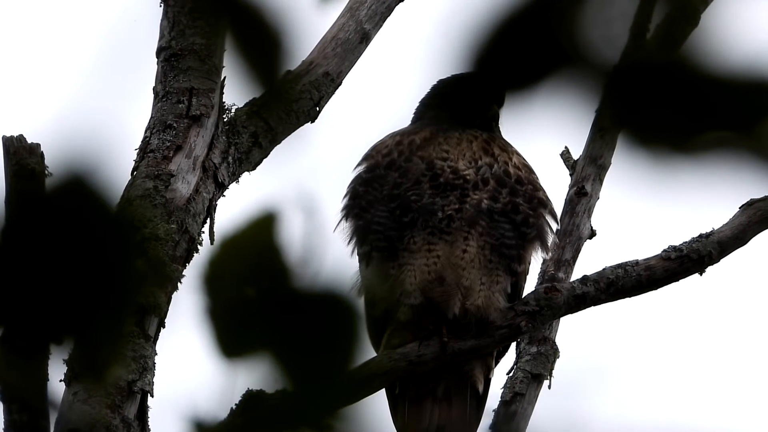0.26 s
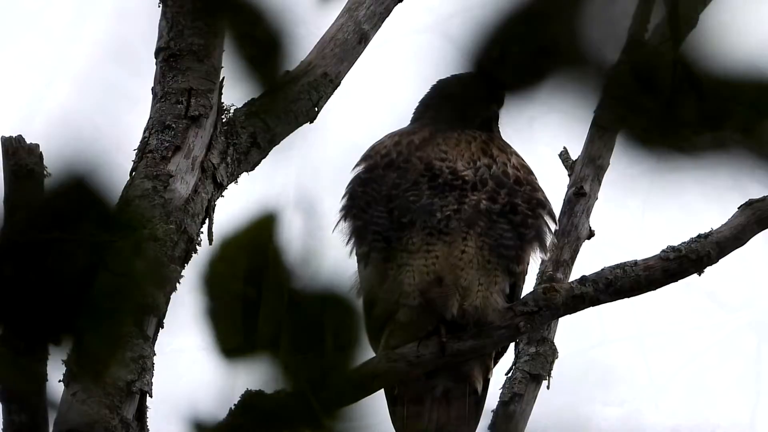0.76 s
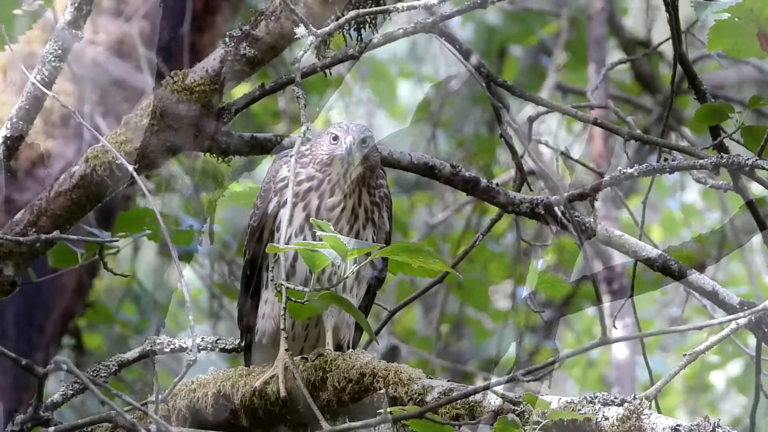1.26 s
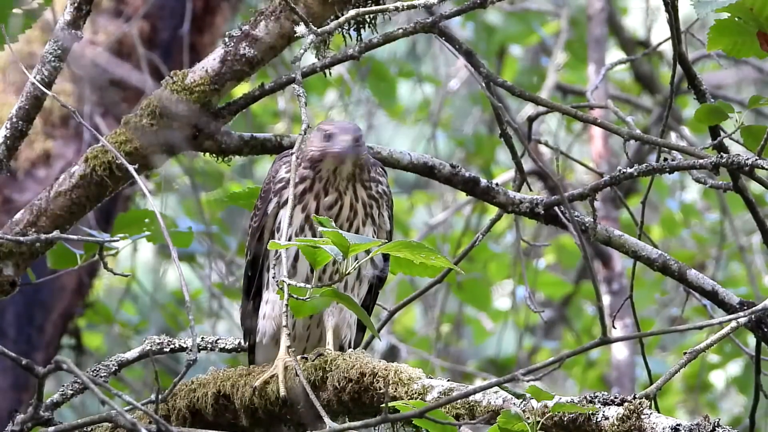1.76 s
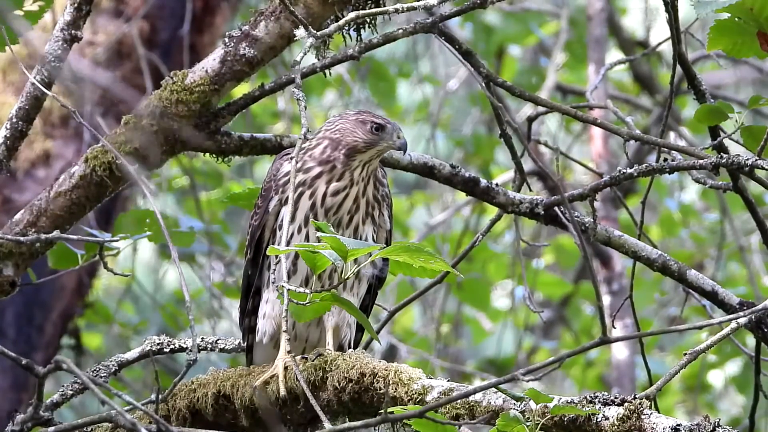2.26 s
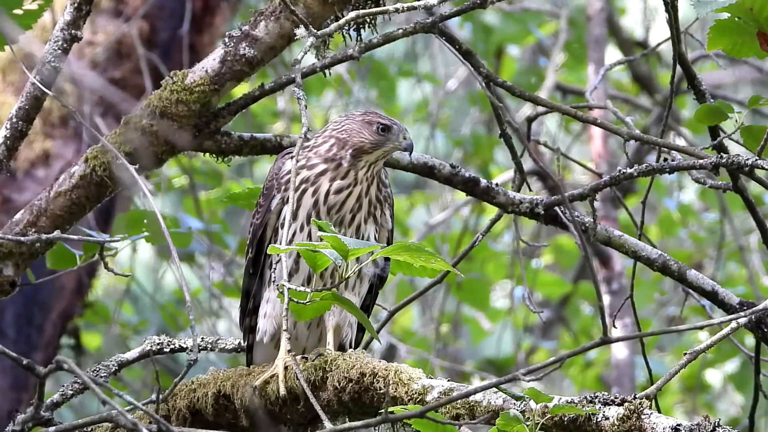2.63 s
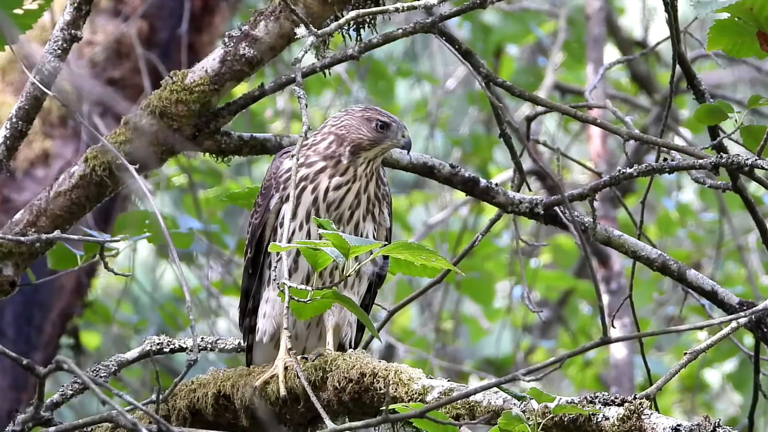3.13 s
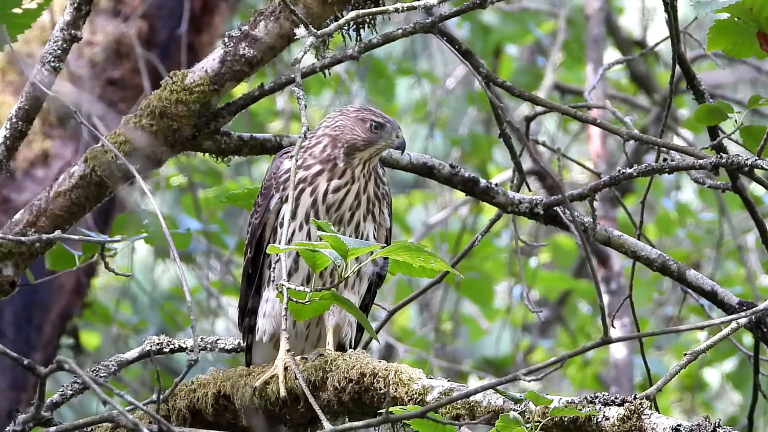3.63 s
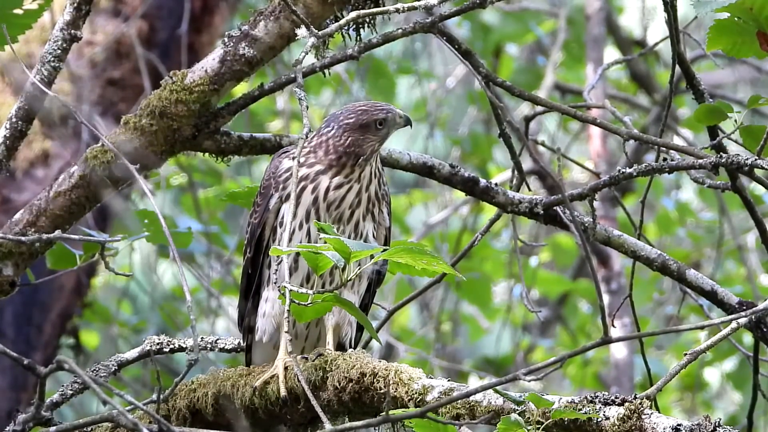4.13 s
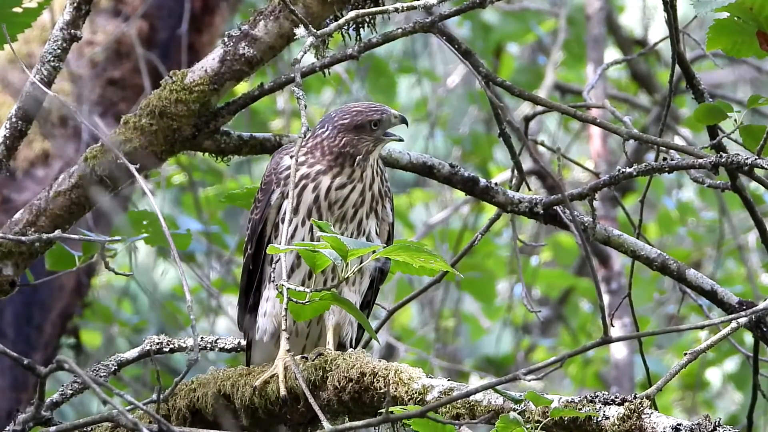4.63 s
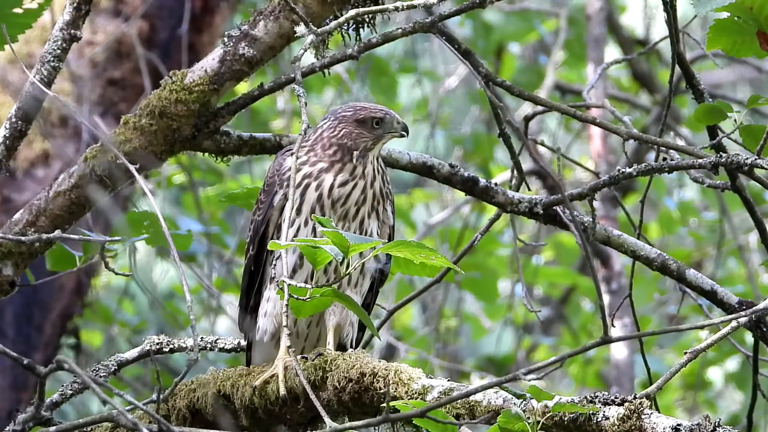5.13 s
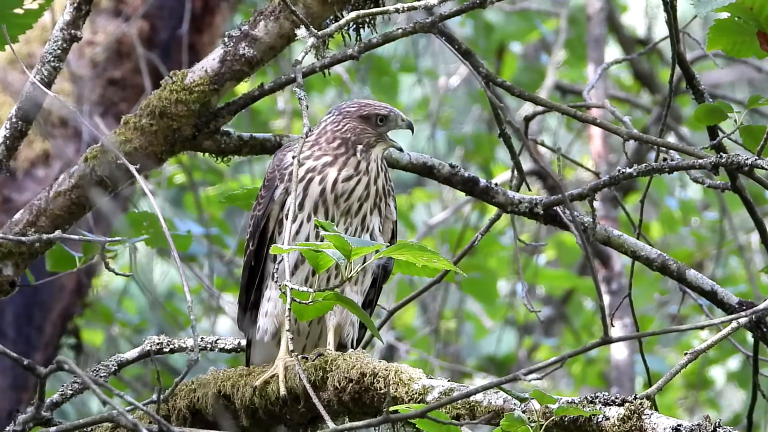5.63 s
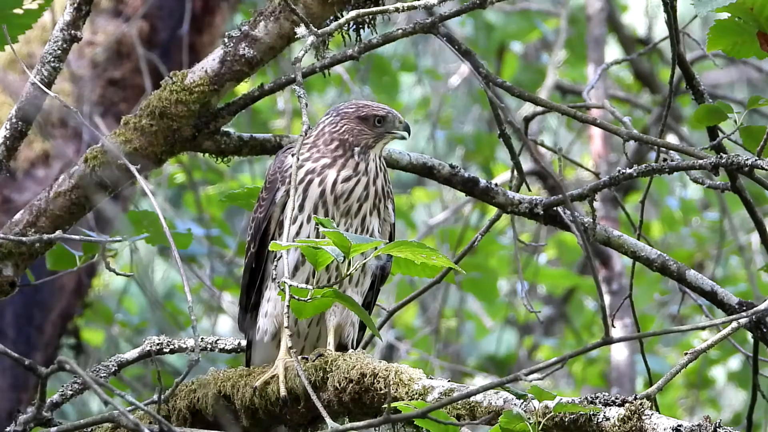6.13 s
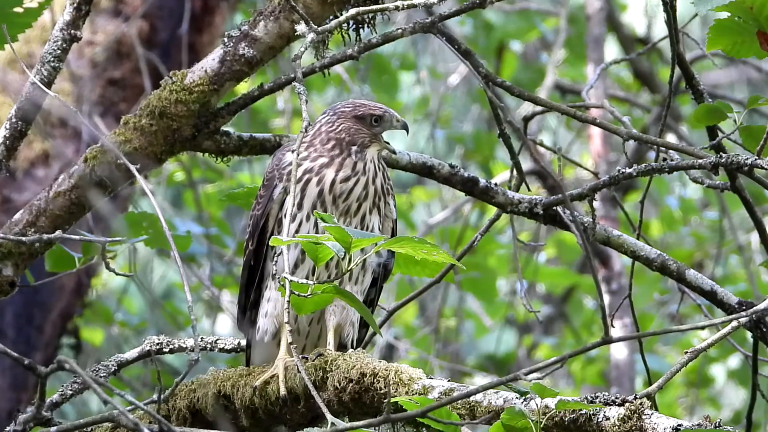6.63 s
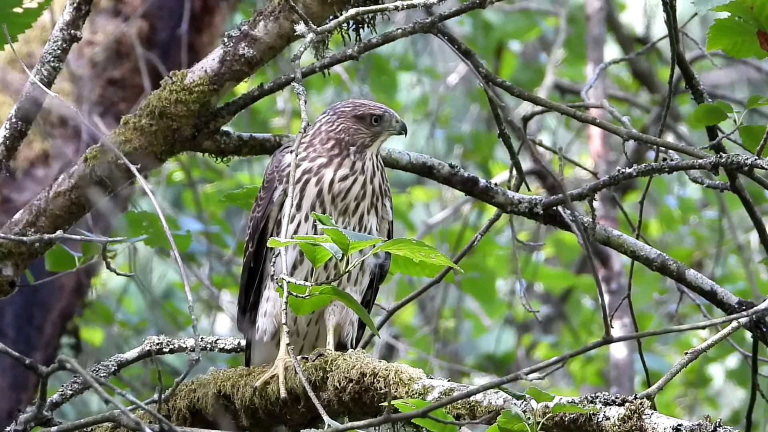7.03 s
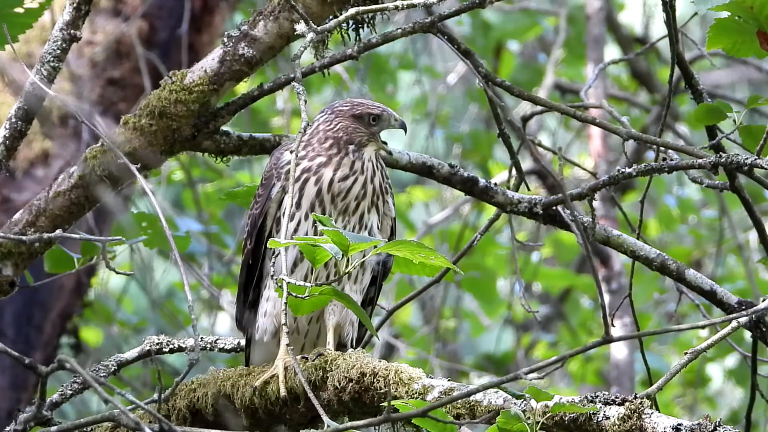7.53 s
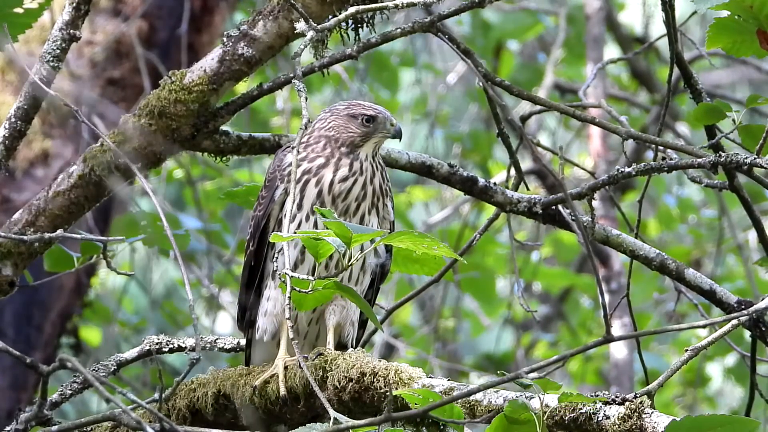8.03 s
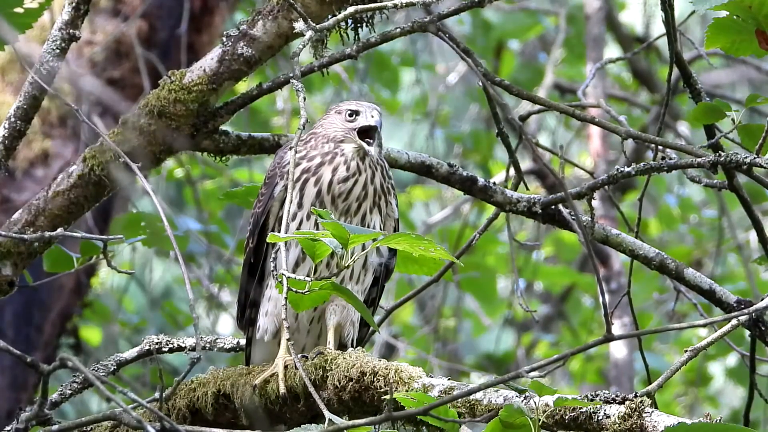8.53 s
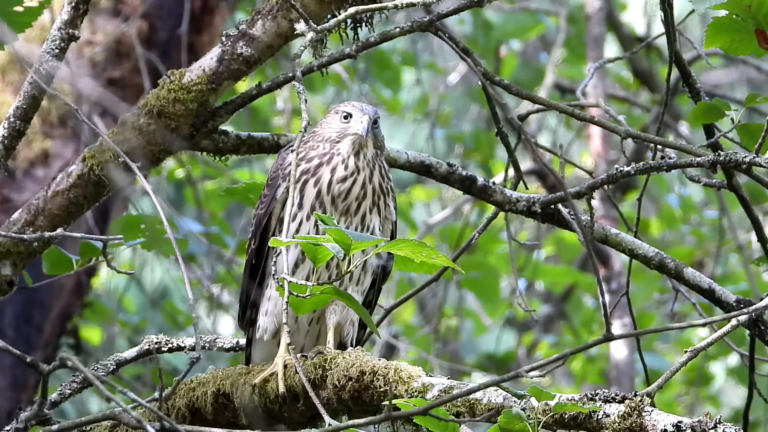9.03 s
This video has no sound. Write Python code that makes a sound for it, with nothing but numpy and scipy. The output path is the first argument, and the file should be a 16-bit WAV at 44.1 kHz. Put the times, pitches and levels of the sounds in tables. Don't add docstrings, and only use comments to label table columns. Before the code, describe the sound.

For the first four seconds there is only quiet forest ambience: low, uneven gusts bump softly against the camera microphone, a distant road rumbles and swells slightly around one second, and thin hiss lies on top. The faint background starts a little wide, then becomes mono by 1.6 seconds. Tiny blurred songbird notes appear mostly in the first second and a half, with a few later. Soft low knocks on the camera body fall at 2.2 and, fainter, 3.0. At about 4.5 a young hawk gives a short, weak, falling whistle. Stronger calls follow at 5.4, 6.4, 7.4 and 8.4, each roughly half a second: a quick buzzy upward scoop, then a piercing whistle sliding down, rough and beating, with a short echo off trunks. The last is highest and longest. Wind dies down; a faint engine drone hums beneath the later calls.

```python
import sys
import numpy as np
from scipy import signal
from scipy.fft import rfft, irfft
from scipy.io import wavfile
from scipy.ndimage import uniform_filter1d

SR = 44100
rng = np.random.default_rng(int(sys.argv[2]) if len(sys.argv) > 2 else 0)


def rack_gain(trim_db):
    fader = np.asarray(trim_db, float)
    return 10 ** (fader / 20)


def wrap_up_sound(samples):
    columns = np.atleast_2d(samples).T
    tamed = np.clip(columns, -1, 1)
    steps = np.round(tamed * 32767).astype(np.int16)
    wavfile.write(sys.argv[1], SR, steps)


N = 409248
TIME = np.arange(N) / SR

# frequency in Hz, gain in dB.
THROAT_GAIN = [(300, -55.5), (1000, -19.5), (1600, -16), (2200, -15), (2800, -11), (3150, -5.5),
               (3700, 1.5), (4400, -4.5), (5500, -5), (6000, -14), (8300, -28), (9200, -28), (10300, -26),
               (13500, -42)]
RASP_TOP_DB = -36.5


def hawk():
    # time in seconds, pitch in Hz, level in dB.
    whistles = [
        [(4.52, 3170, -30), (4.554, 3122, -40), (4.562, 3094, -36), (4.584, 3010, -34.5), (4.676, 2939, -31),
         (4.706, 2773, -41.5), (4.744, 2710, -40.5), (4.775, 2636, -42.5)],
        [(5.472, 3558, -17), (5.504, 4060, -28), (5.528, 3659, -23.5), (5.574, 3488, -20), (5.694, 3353, -31),
         (5.764, 3194, -24), (5.828, 3096, -36), (5.875, 2937, -33)],
        [(6.458, 3470, -24), (6.486, 4250, -22), (6.548, 4265, -24.5), (6.632, 4020, -27), (6.638, 3747, -25),
         (6.714, 3519, -20.5), (6.824, 3390, -26.5), (6.885, 3126, -27.5)],
        [(7.451, 4240, -30), (7.459, 4220, -26.5), (7.561, 4306, -27.5), (7.637, 4096, -30.5),
         (7.669, 3825, -18), (7.685, 3850, -21.5), (7.869, 3387, -23.5), (7.934, 3210, -28.5)],
        [(8.466, 4113, -27), (8.476, 4390, -28.5), (8.596, 4250, -26.5), (8.702, 3850, -26.5),
         (8.714, 3804, -20), (8.766, 3580, -25), (8.828, 3561, -21.5), (8.932, 3234, -31)],
    ]
    # start in seconds, scoop length in seconds, top pitch in Hz,
    # time it steadies in seconds, end pitch in Hz.
    buzzes = [
        (4.475, 0.052, 1398, 4.49, 1273),
        (5.431, .047, 1568, 5.59, 1381),
        (6.423, .04, 1622, 6.71, 1494),
        (7.398, .052, 1647, 7.79, 1547),
        (8.419, .046, 1670, 8.73, 1523),
    ]
    # scoop level in dB, steady low-voice level in dB,
    # steady unsteadiness in Hz, octave level in dB, rasp level in dB.
    efforts = [
        (-40, -47, 2.5, -63.5, -41),
        (-37, -47.5, 16.3, -61.5, -39),
        (-35.5, -48, 40, -58, -36.5),
        (-35, -52, 40, -58.5, -37),
        (-34.5, -47, 24, -52.5, -35.5),
    ]
    return sum(call(*parts) for parts in zip(whistles, buzzes, efforts))


def call(whistle, buzz, effort):
    start_s, scoop_s = buzz[:2]
    scoop_db, _, _, octave_db, rasp_db = effort
    knots_s, knots_hz, knots_db = np.transpose(released(whistle))
    start = int(start_s * SR)
    t = TIME[start:int(knots_s[-1] * SR)]
    since = np.maximum(t - knots_s[0], 0)

    hi_hz, hi_db = np.interp(t, knots_s, knots_hz), np.interp(t, knots_s, knots_db)
    hi_gate = np.clip(np.minimum(t - knots_s[0], knots_s[-1] - t) / 0.004, 0, 1)
    lo_hz, lo_db, boost_db, shake_hz = low_voice(t, buzz, effort, hi_db, since)
    lo_gate = np.clip(np.minimum(t - t[0], t[-1] - t) / 0.014, 0, 1)

    hi_phase = phase_of(hi_hz + (8 + 0.06 * shake_hz) * walk(250, len(t)))
    lo_phase = phase_of(lo_hz + (10 + 1.2 * shake_hz) * walk(500, len(t)))
    flutter = np.clip(1 + (0.18 + 0.001 * shake_hz) * walk(130, len(t)), 0, 1.3)
    hi = np.sqrt(2) * hi_gate * rack_gain(hi_db) * flutter
    lo = np.sqrt(2) * lo_gate * rack_gain(lo_db + 2.03 * walk(220, len(t)))

    inner = buzz_partials(lo, lo_phase, boost_db)
    inner += mixing_tones(lo, hi_phase, lo_phase, hi_gate, since)
    inner += rasp(t, since, hi_phase, hi_gate, lo_gate, rasp_db)
    out = hi * np.sin(hi_phase) + lo * np.sin(lo_phase) + throat(inner)
    out += whistle_overtones(t, since, hi_hz, hi_db, hi_phase, hi_gate, shake_hz, octave_db)
    out += torn_halo(hi_phase, hi_gate, shake_hz, rasp_db)
    out += beak_gape(t, since, scoop_s, scoop_db)
    return np.pad(out, (start, N - start - len(t)))


def released(whistle):
    release_s, release_db, hook_share = 0.03, 20, 0.3
    s, hz, db = whistle[-1]
    hook_hz = hook_share * (max(row[1] for row in whistle) - hz)
    hook = [(s + release_s * u, hz - hook_hz * u, db - release_db * u ** 0.85) for u in (0.4, 1)]
    return list(whistle) + hook


def low_voice(t, buzz, effort, hi_db, since):
    scoop_from_hz, scoop_bend, hold_s = 920, 1.1, 0.00985
    scoop_rise_db, scoop_boost_db, scoop_shake_hz = 10.5, 8.5, 5.7
    torn_drop_db, torn_boost_db, torn_shake_hz, tear_s = 10, -3, 190.1, 0.011
    steady_s, steady_boost_db = 0.05, -1
    knee_db, follow = -37.5, 4
    tire_db, tire_s = 9.5, 0.067
    handover_db, handover_s = 12, 0.004
    start_s, scoop_s, top_hz, steadies_s, end_hz = buzz
    top_db, steady_db, calm_hz = effort[:3]

    scoop = np.clip((t - start_s) / scoop_s, 0, 1)
    after = np.clip((t - start_s - scoop_s - hold_s) / tear_s, 0, 1)
    steady = np.clip((t - steadies_s) / steady_s + 0.5, 0, 1)

    def blend(rising, torn, held):
        return (1 - after) * rising + after * ((1 - steady) * torn + steady * held)

    sag_s = max(steadies_s - steady_s, start_s + scoop_s)
    hz = scoop_from_hz + (top_hz - scoop_from_hz) * (1 - (1 - scoop) ** scoop_bend)
    hz = hz + np.interp(t, (sag_s, t[-1]), (0, end_hz - top_hz))
    held_db = steady_db + follow * np.minimum(hi_db - knee_db, 0)
    held_db = held_db - tire_db * np.exp((t - t[-1]) / tire_s)
    db = blend(top_db - scoop_rise_db * (1 - scoop), steady_db - torn_drop_db, held_db)
    bright_db = scoop_boost_db * (1 - scoop) - handover_db * np.minimum(since / handover_s, 1)
    boost_db = blend(bright_db, torn_boost_db, steady_boost_db)
    return hz, db, boost_db, blend(scoop_shake_hz, torn_shake_hz, calm_hz)


def buzz_partials(lo, lo_phase, boost_db):
    # one level each, in dB.
    partials_db = [7, 9, -5, -7, -7, -8, -9, -10]
    return sum(lo * rack_gain(boost_db + db) * np.sin(k * lo_phase + k * k) for k, db in enumerate(partials_db, 2))


def mixing_tones(lo, hi_phase, lo_phase, hi_gate, since):
    beat_db, order_db, fall_db, sum_tone_db = 13, -3.5, -2.5, 8
    couple_s = 0.022
    coupled = lo * hi_gate * np.clip(since / couple_s, 0, 1) ** 2
    out = coupled * rack_gain(sum_tone_db) * np.sin(hi_phase + lo_phase)
    for m in range(1, 4):
        for k in (-4, -3, -2, -1, 1, 2, 3):
            tone_db = beat_db + order_db * m + fall_db * abs(k)
            out += coupled * rack_gain(tone_db) * np.cos(m * hi_phase + k * lo_phase)
    return out


def rasp(t, since, hi_phase, hi_gate, lo_gate, rasp_db):
    fall_db, curve = 18, 1.1
    now_db = rasp_db - fall_db * (since / since[-1]) ** curve
    halo = rack_gain(13.0) * walk(1200, len(t)) * np.cos(hi_phase)
    breath = rack_gain(10.5) * rng.standard_normal(len(t))
    airflow = np.maximum(hi_gate, 0.4 * lo_gate * np.clip((t - t[0]) / 0.03, 0, 1))
    return rack_gain(np.minimum(now_db, RASP_TOP_DB)) * (hi_gate * halo + airflow * breath)


def throat(x):
    hz = np.arange(len(x) // 2 + 1) * SR / len(x)
    return irfft(rfft(x) * rack_gain(curve_db(hz, THROAT_GAIN)), len(x))


def whistle_overtones(t, since, hi_hz, hi_db, hi_phase, hi_gate, shake_hz, octave_db):
    ref_hz, db_per_khz, kick_db, kick_s = 3400, -16.5, 7.5, 0.043
    knee_db, follow, third_db, release_s = -34.5, 0.7, 15.5, 0.03
    now_db = octave_db + db_per_khz * (hi_hz - ref_hz) / 1000
    now_db += kick_db * np.exp(-since / kick_s) + np.minimum(hi_db - knee_db, 0) * follow
    strength = np.sqrt(2) * hi_gate * rack_gain(now_db - 0.5) * np.clip((t[-1] - t) / release_s - 1, 0, 1)
    second = (1 + (0.45 + 0.005 * shake_hz) * walk(350, len(t))) * np.sin(2 * hi_phase)
    third = (0.6 + 0.76 * walk(400, len(t))) * np.sin(3 * hi_phase)
    return strength * (second + rack_gain(third_db + curve_db(3 * hi_hz, THROAT_GAIN)) * third)


def torn_halo(hi_phase, hi_gate, shake_hz, rasp_db):
    torn = hi_gate * shake_hz / 190.1 * rack_gain(rasp_db - RASP_TOP_DB)
    bands = ((2, -68.5), (3, -72))  # partial, dB
    return sum(torn * rack_gain(db) * walk(900, len(torn)) * np.cos(k * hi_phase) for k, db in bands)


def beak_gape(t, since, scoop_s, scoop_db):
    # centre in Hz, level in dB.
    gape_bands = [(8300, -53), (10800, -62.5)]
    decay_s, ref_db = 0.09, -34.5
    gape = np.clip((t - t[0]) / scoop_s, 0, 1) ** 2 * np.exp(-since / decay_s) * rack_gain(scoop_db - ref_db)
    return sum(gape * rack_gain(db) * walk(1000, len(t)) * np.cos(2 * np.pi * hz * t) for hz, db in gape_bands)


def forest(x):
    near_t60_s, near_db, far_t60_s, far_db = 0.16, -5.5, 0.88, -15
    t = TIME[:int(1.5 * SR)]
    near = rng.standard_normal(len(t)) * rack_gain(-60 * t / near_t60_s) * (t > 0.004)
    far = rng.standard_normal(len(t)) * rack_gain(-60 * t / far_t60_s) * np.clip(t / 0.031, 0, 1)
    echo = rack_gain(near_db) * near / np.linalg.norm(near) + rack_gain(far_db) * far / np.linalg.norm(far)
    return x + signal.fftconvolve(x, echo)[:N]


def songbirds():
    # start in seconds, end in seconds, start pitch in Hz, end pitch in Hz, level in dB.
    song_notes = [(-.02, 0.15, 3070, 3040, -61.5), (0.016, .06, 2200, 2230, -61),
                  (0.075, 0.127, 2280, 2270, -56), (0.167, 0.272, 2300, 2290, -63),
                  (0.323, 0.476, 3340, 3340, -66), (0.497, .7, 3340, 3300, -70),
                  (0.453, 0.823, 4270, 4260, -72.5), (0.837, 1.012, 3440, 3294, -63.5),
                  (0.971, 1.297, 3400, 3220, -66.5), (1.58, 1.86, 7740, 7480, -70),
                  (2.997, 3.276, 7670, 7250, -67), (4.26, 4.463, 3490, 3490, -68),
                  (4.847, 4.872, 2190, 2060, -53), (5.28, 5.451, 4120, 3880, -65)]
    out = np.zeros(N)
    for t0, t1, hz0, hz1, db in song_notes:
        u = np.clip((TIME - t0) / (t1 - t0), 0, 1)
        phase = phase_of(hz0 + (hz1 - hz0) * u + 26 * walk(80))
        fade = np.minimum(8 * u, 1) * (1 - u) ** 0.16
        out += rack_gain(db + 2 + 2.5 * walk(60)) * fade * np.sin(phase)
    return out


def wind():
    # frequency in Hz, density in dB per Hz.
    wind_colour = [(12, -45.5), (20, -9.5), (49, -1), (81, 0), (128, -6.5), (200, -11.5), (260, -46),
                   (440, -120)]
    buffet_ref_db, slope, gust_ref_db, dies_db_per_s = -56, 0.54, -54.5, -1.3
    wind_db = gusts()
    buffet_db = buffet_ref_db + slope * (wind_db - gust_ref_db) + dies_db_per_s * TIME + 1.5 * walk(4.4)
    out = noise(wind_colour, 36, 50) * rack_gain(buffet_db + 1.5 * walk(7))
    return out + noise(wind_colour, 61, 180) * rack_gain(wind_db + 0.91 * walk(11.0))


def gusts():
    # centre in seconds, half length in seconds, level in dB.
    gust_rows = [(0.0, 0.097, -54.5), (.45, 0.083, -45), (0.847, 0.086, -46), (1.1, 0.088, -45.5),
                 (1.432, 0.18, -43.5), (1.78, 0.19, -48.5), (2.03, 0.1, -47), (2.404, 0.054, -50),
                 (2.764, 0.11, -44.5), (2.97, 0.073, -44), (3.19, 0.11, -43), (3.68, 0.15, -50),
                 (3.88, 0.041, -51.5), (4.4, 0.065, -41.5), (4.62, 0.16, -50), (5.05, 0.15, -58),
                 (5.583, 0.087, -53), (5.93, 0.11, -54), (6.302, 0.13, -54), (6.853, 0.15, -58),
                 (7.23, .06, -55), (7.5, 0.088, -53), (7.82, 0.068, -58)]
    calm_db, calms_db_per_s = -53, -0.98
    power = rack_gain(calm_db + calms_db_per_s * TIME) ** 2
    for s, half_s, db in gust_rows:
        power = power + rack_gain(db) ** 2 * np.exp(-((TIME - s) / half_s) ** 2)
    return 10 * np.log10(power)


def road():
    # frequency in Hz, density in dB per Hz.
    road_colour = [(59, -33), (100, 4.5), (176, -6), (224, -2), (289, -5), (355, -4), (518, -7), (851, 0.5),
                   (2300, -21.5), (3410, -22), (6000, -28), (7800, -55), (13200, -120)]
    swell_s, nears_db_per_s = (0.59, 1.25), 0.1829
    low_db = np.interp(TIME, swell_s, (-52, -52.5)) + nears_db_per_s * TIME + 0.5 * walk(4.5)
    roar_db = np.interp(TIME, swell_s, (-64, -51.5)) + nears_db_per_s * TIME
    out = noise(road_colour, 150, 460) * rack_gain(low_db + 0.6 * walk(5))
    out += noise(road_colour, 360, 1480) * rack_gain(roar_db + 2.0 + 0.49 * walk(19))
    return out + noise(road_colour, 1740, 5540) * rack_gain(0.17 * roar_db - 49.5 + 0.29 * walk(33))


def engine_drone():
    # multiple of the fundamental, start in seconds, end in seconds, level in dB.
    drone_partials = [(5, 6.9, 9.2, -51.5), (7, 7, 11, -61), (10, 7.9, 5.8, -61), (12, 4.2, 7.5, -64),
                      (12, 8.45, 9.05, -49.5), (14, 6.4, 8.2, -61), (14, 8.65, 9.6, -47.5),
                      (16, 6.3, 12, -59.5), (14, 1.37, 5.7, -60.5), (12, 3.2, 3.3, -61)]
    fundamental_hz = 24.1
    out = np.zeros(N)
    for k, t0, t1, db in drone_partials:
        swell = np.clip(np.minimum(TIME - t0, t1 - TIME) / 0.063, 0, 1)
        phase = phase_of(round(k) * fundamental_hz + 2 * walk(12))
        out += swell * rack_gain(db + 2 * walk(5)) * np.sin(phase)
    return out


def camera_knocks():
    # time in seconds, peak in dB, pitch in Hz.
    knocks = [
        (2.216, -32.5, 70),
        (2.979, -39, 60),
    ]
    out = np.zeros(N)
    for s, db, hz in knocks:
        out += rack_gain(db) * np.exp(-((TIME - s) / 0.0095) ** 2) * np.sin(2 * np.pi * hz * (TIME - s))
    return out


def amplifier_hiss():
    # frequency in Hz, density in dB per Hz.
    hiss_colour = [(2350, -35), (4000, -7), (5350, 0), (6980, -3.5), (15600, -5)]
    return noise(hiss_colour, 5500, 20000) * rack_gain(-62.5 + 0.5 + 0.4 * walk(6))


def stereo_spread():
    # frequency in Hz, density in dB per Hz.
    spread_colour = [(15, -34), (25, -5), (66, -14), (119, -9.5), (359, -7.5), (686, -12.5), (2240, -14.5),
                     (2630, -15), (15600, -18.5)]
    # time in seconds, level in dB.
    spread_fade = [(0, -59.5), (.9, -60), (1.3, -67.5), (1.55, -72), (1.64, -130)]
    apart = noise(spread_colour, 14, 20000) * rack_gain(np.interp(TIME, *np.transpose(spread_fade)))
    return apart * np.array([[1], [-1]])


def phase_of(hz):
    return np.cumsum(hz) * 2 * np.pi / SR


def walk(rate_hz, size=N):
    k = max(int(SR / rate_hz), 1)
    x = rng.standard_normal(size + 2 * k)
    x = uniform_filter1d(uniform_filter1d(x, k), k)[k:k + size]
    return x * np.sqrt(1.454 * k)


def curve_db(hz, table):
    f, db = np.transpose(table)
    return np.interp(np.log(np.maximum(np.abs(hz), 1)), np.log(f), db)


def noise(table, lo_hz, hi_hz):
    hz = np.maximum(np.arange(N // 2 + 1) * SR / N, 1)
    edge = 1 / np.sqrt((1 + (lo_hz / hz) ** 8) * (1 + (hz / hi_hz) ** 8))
    x = irfft(rfft(rng.standard_normal(N)) * rack_gain(curve_db(hz, table)) * edge, N)
    return x / np.sqrt(np.mean(x ** 2))


def scene():
    mid = forest(hawk() + songbirds()) + wind() + road() + engine_drone() + camera_knocks()
    return np.array([mid, mid])


def top_cut(x):
    return signal.sosfilt(signal.butter(12, 15720, fs=SR, output="sos"), x)


def record(dry):
    mix = dry + amplifier_hiss() + stereo_spread()
    return top_cut(mix)


dry = scene()
out = record(dry)
wrap_up_sound(out)
```